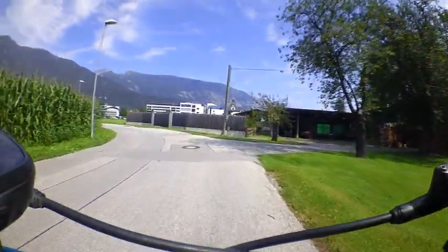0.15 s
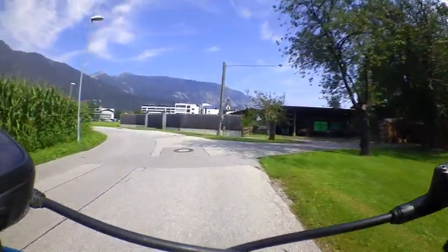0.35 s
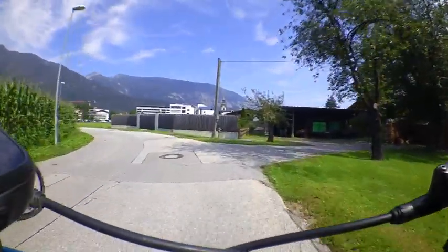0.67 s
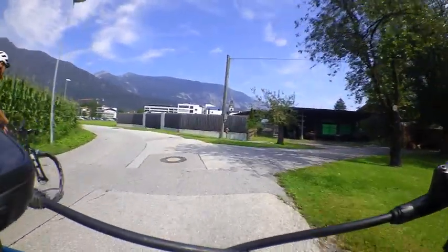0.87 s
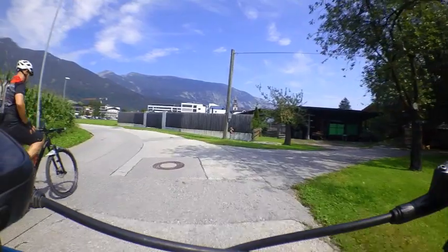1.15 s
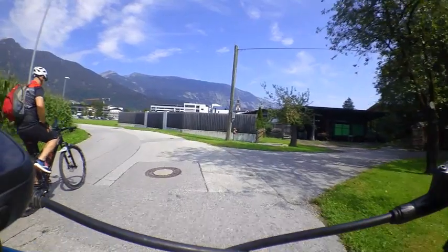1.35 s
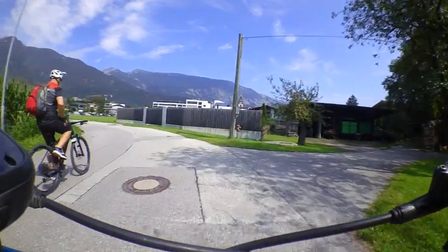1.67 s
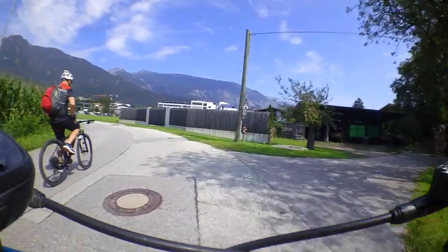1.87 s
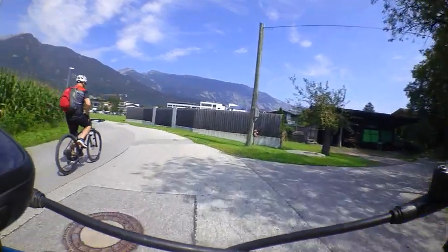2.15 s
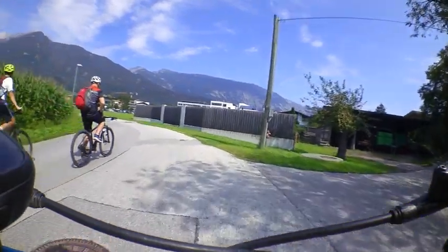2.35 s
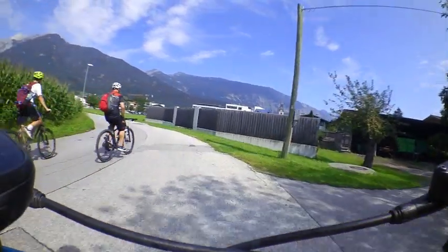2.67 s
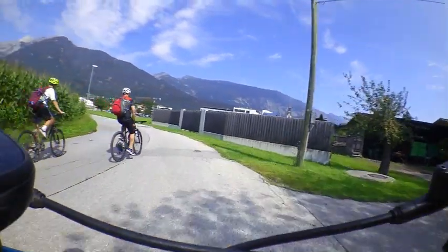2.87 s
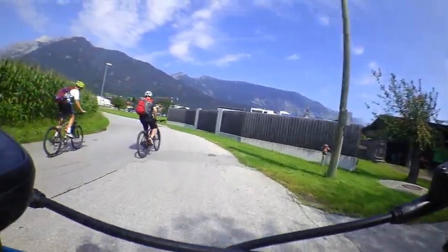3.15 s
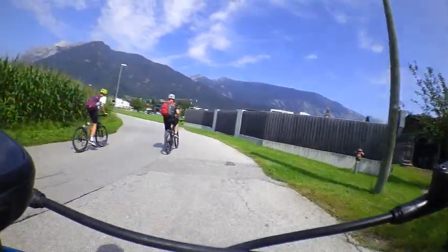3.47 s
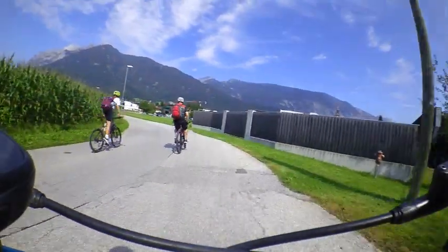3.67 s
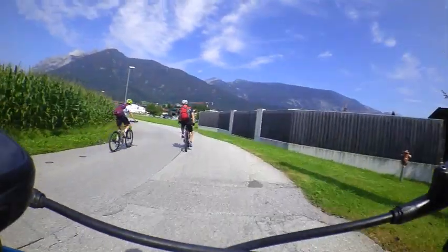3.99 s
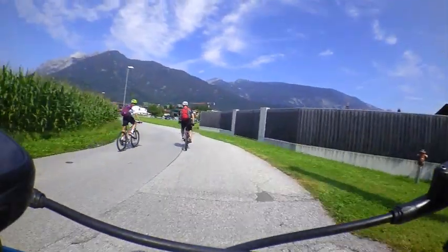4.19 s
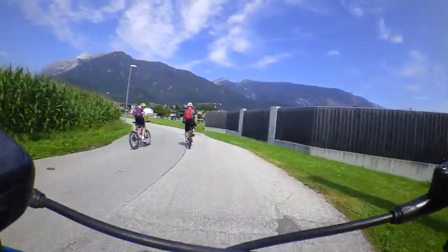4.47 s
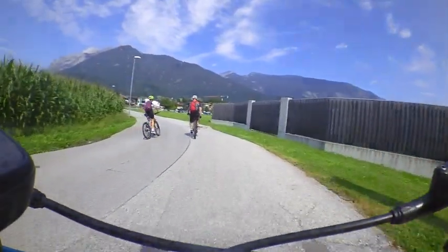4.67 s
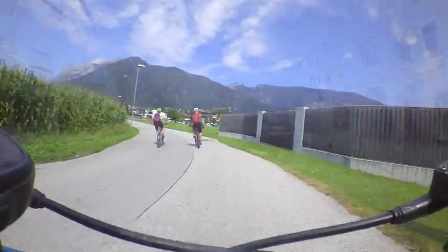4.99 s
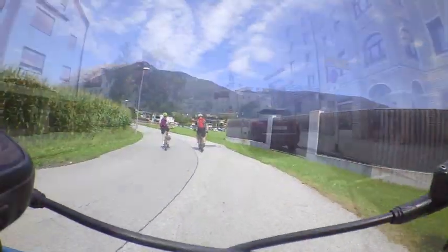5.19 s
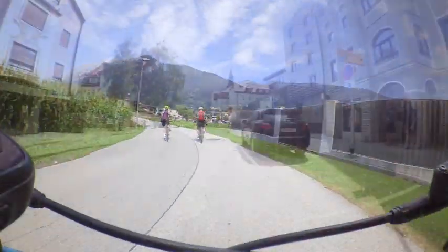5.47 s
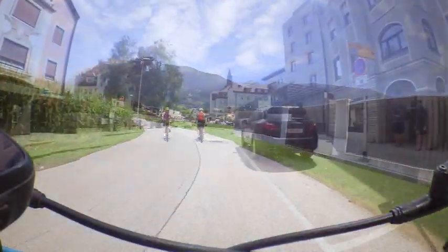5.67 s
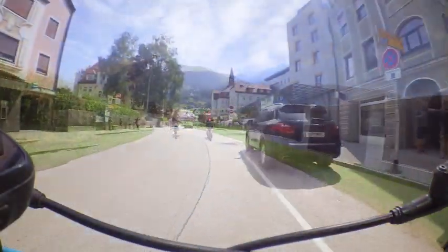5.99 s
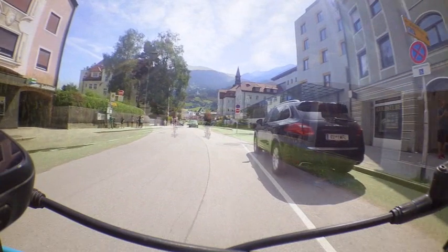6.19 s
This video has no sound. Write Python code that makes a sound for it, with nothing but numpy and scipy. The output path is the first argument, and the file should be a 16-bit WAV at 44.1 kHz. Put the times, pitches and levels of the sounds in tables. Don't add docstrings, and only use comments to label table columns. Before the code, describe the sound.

A bicycle coasts over patched asphalt with a low droning frame rumble, tyre roar, thumps and hard rattling knocks, then smooths out and quietens.

```python
import sys
import numpy as np
from scipy import signal
from scipy.fft import rfft, irfft, next_fast_len
from scipy.io import wavfile
from scipy.ndimage import uniform_filter1d

SR = 44100
rng = np.random.default_rng(int(sys.argv[2]) if len(sys.argv) > 2 else 0)


def undo_db(level):
    steps = np.asarray(level, float) / 20
    return 10 ** steps


def wav_out(sig):
    wavfile.write(sys.argv[1], SR, np.round(np.clip(np.atleast_2d(sig).T, -1, 1) * 32767).astype(np.int16))


N = 279263
SETTLED_S = 5.38

# (frequency [Hz], width [Hz], level [dB])
FRAME_MODES = [(85.4, 57, -14.5), (147.6, 95.7, -8), (196.5, 23.1, 0), (246.7, 29, -13.5)]
# (frequency [Hz], width [Hz], level [dB])
BAR_MODES = [(314.3, 33.8, -2), (380.5, 16.6, 0.5), (434.8, 50.4, 1), (504.2, 61.2, -1.5), (583, 111, -12)]
# (frequency [Hz], width [Hz], level [dB])
CLAMP_MODES = [(752, 59, 7.5), (900, 48, -1.5), (1050, 100, -6), (1366, 290, -31), (1740, 67, -4.5)]
# (frequency [Hz], width [Hz], level [dB])
CASE_MODES = [(5360, 1800, 7), (6340, 620, 10), (7100, 220, 2)]
# (time [s], level re ordinary asphalt [dB])
SURFACE_GRAIN = [(0, 3.5), (.76, 2), (1.9, 1), (2.5, 0.5), (2.56, 1.5), (2.66, -5.5), (3.0, -4.5),
                 (3.5, 0.5), (3.8, -4), (4.05, -2.5), (4.6, -4.5), (4.9, -2.5), (5.16, -6.5), (5.6, -4),
                 (5.95, -4), (6.1, -0.5), (6.33, -2.5)]
# (time [s], half length [s], tread roar [dB], heave [dB])
SURFACE_PATCHES = [(.32, .07, 0, 5), (.5, .05, 0.5, -3.5), (.95, 0.087, 0.5, -6), (1.07, .09, 2, 5),
                   (1.27, 0.044, 1.3, -5.5), (1.65, 0.11, 2, 0.7), (2.3, 0.11, -0.5, -4),
                   (2.5, .05, 0, 4.5), (3.0, 0.08, -0.3, 6), (3.3, 0.05, -3, 2.5), (3.58, 0.065, .3, -3.5),
                   (4.27, 0.045, 0, -5.5), (4.65, .08, -1, -0.5), (5.02, 0.044, 5.5, 3),
                   (5.25, 0.056, 1.5, 5.5), (5.6, .06, .3, -5), (6.04, .05, 0.5, -8)]


def rms_one(x):
    return x / np.sqrt(np.mean(x ** 2) + 1e-20)


def in_time(rows):
    s, *columns = np.transpose(rows)
    return [np.interp(np.arange(N) / SR, s, c) for c in columns]


def at_hz(points, hz):
    table_hz, values = np.array(points)[:, 0], np.array(points)[:, 1]
    return np.interp(np.log(hz), np.log(table_hz), values)


def swells_db(rows):
    s, half, first_db, second_db = np.transpose(rows)
    coarse = np.arange(0, N + 20, 20)
    bell = np.exp(-((coarse[:, None] / SR - s) / half) ** 2)
    return [np.interp(np.arange(N), coarse, bell @ db) for db in (first_db, second_db)]


def drift(rate):
    r = np.exp(-40 * np.pi * rate / SR)
    slow = signal.lfilter([1], [1, -2 * r, r * r], rng.standard_normal(N // 20 + 2002))[2000:]
    return np.interp(np.arange(N) / 20, np.arange(len(slow)), rms_one(slow))


def low_pass(x, hz, order):
    return signal.sosfilt(signal.butter(order, hz, fs=SR, output="sos"), x)


def resonate(x, hz, width_hz):
    r = np.exp(-np.pi * width_hz / SR)
    zeros = np.array([1, 0, -1]) * (1 - r * r) / 2
    poles = [1, -2 * r * np.cos(2 * np.pi * hz / SR), r * r]
    return signal.lfilter(zeros, poles, x + 1e-18)


def body(x, modes):
    return sum((-1) ** k * undo_db(db) * resonate(x, hz, width) for k, (hz, width, db) in enumerate(modes))


def stereo(mid, side, hz):
    # (frequency [Hz], left-right likeness [0..1])
    likeness = [(30, 0.93), (120, 0.98), (300, 1), (500, 1), (1200, 0.93), (4000, 0.76), (12000, 0.57)]
    alike = np.clip(at_hz(likeness, hz), 0, 1)
    opposite = np.array([[1], [-1]])
    return np.sqrt((1 + alike) / 2) * mid + np.sqrt((1 - alike) / 2) * side * opposite


def grit(per_s, spread_db, smooth):
    struck = rng.random(N) < per_s / SR
    sizes = undo_db(spread_db * np.minimum(rng.exponential(1, N), 5)) * struck
    return rms_one(sizes * rng.standard_normal((2, N))) + smooth * rng.standard_normal((2, N))


def banded(source, spectrum, shared_db, own_db, count):
    size = next_fast_len(N)
    hz = np.maximum(np.fft.rfftfreq(size, 1 / SR), 1)
    lowest, highest = spectrum[0][0], spectrum[-1][0]
    skirted = [(lowest * .7, -90)] + spectrum + [(highest * 1.1, -90)]
    coloured = rfft(source, size) * undo_db(at_hz(skirted, hz))
    centres, together = np.geomspace(lowest, highest, count), drift(70.0)
    out = 0
    for k, centre in enumerate(centres):
        share = np.interp(np.log(hz), np.log(centres), np.arange(count) == k)
        mid, side = irfft(coloured * share, size)[:, :N]
        out = out + undo_db(shared_db * together + own_db * drift(4.1)) * stereo(mid, side, centre)
    return rms_one(out)


def shaken(shake, modes, cut_hz, order, hold_s):
    lead_in = np.concatenate([shake[:, -4000:], shake], axis=1)
    rung = low_pass(body(lead_in, modes), cut_hz, order)[:, 4000:]
    hold = round(hold_s * SR)
    level = uniform_filter1d(uniform_filter1d(rung[0] ** 2, hold), hold)
    return rms_one(rung / (level + .02 * level.mean()) ** .36)


def bursts(times, peaks_db, length_s):
    out, age = np.zeros((2, N + 2000)), np.arange(2000) / SR / length_s
    rattle = rng.standard_normal((len(times), 2, 2000)) * age * np.exp(1 - age)
    for s, db, contacts in zip(times, peaks_db, rattle):
        start = round(s * SR)
        out[:, start:start + 2000] += undo_db(db) * contacts
    return out[:, :N]


def recorder_gain_db():
    # (time [s], depth [dB])
    ducks = [
        (2.526, 9),
        (2.89, 0),
        (4.951, 4),
        (5.3, -2),
    ]
    attack_s, recover_db_per_s = 0.014, 14
    age = np.arange(N) / SR - np.array(ducks)[:, :1]
    depth_db = np.array(ducks)[:, 1:] - recover_db_per_s * age
    return -np.max(np.clip(age / attack_s, 0, 1) * np.maximum(depth_db, 0), axis=0)


def freewheel(count_so_far, click_db):
    at = np.flatnonzero(np.diff(np.floor(count_so_far)) > 0)
    times = at / SR + rng.uniform(0, 0.0013, len(at))
    puffs = bursts(times, click_db[at] + rng.normal(2.5, 2.0, len(at)), 0.0031)
    bright = resonate(resonate(puffs, 9600, 3000.0), 10800, 3500.0)
    return stereo(*(bright + .3 * resonate(puffs, 5600, 700.0)), 10000) * undo_db([[.8], [-.8]])


def pawls():
    # (time [s], pawl clicks so far [count])
    wheel = [
        (0, .4),
        (1.128, 30),
        (2.408, 62),
        (3.028, 77),
        (3.537, 89),
        (4.181, 104),
        (5.396, 132),
        (5.42, 132.5),
        (6.34, 132.6),
    ]
    own_db, passer_db = -54.5, -55
    passer_per_s, nearest_s, span_s, gone_s = 45, 1.1, 1, 2.5
    t = np.arange(N) / SR
    passing_db = passer_db - 10 * np.log10(1 + ((t - nearest_s) / span_s) ** 4)
    own = freewheel(in_time(wheel)[0], np.full(N, own_db))
    return own + freewheel(passer_per_s * np.minimum(t, gone_s), passing_db)


def tyres():
    # (frequency [Hz], density [dB per Hz])
    roar_spectrum = [(560, -24), (950, 0), (997, 0), (1440, -1.5), (1580, -3), (2270, -5.5), (3270, -11),
                     (3770, -12.5), (4270, -15), (4670, -29), (4900, -42), (6370, -61.5), (10800, -120)]
    # (frequency [Hz], density [dB per Hz])
    hiss_spectrum = [(4700, -16), (5100, -8.5), (5950, -3), (6700, -8.5), (7500, -13), (10100, -12),
                     (12500, -11.5), (14400, -11), (16400, -9.5)]
    # (time
    # [s], level [dB])
    air_rush = [(0, -65.5), (.9, -64), (1.04, -66.5), (2.49, -66.5), (2.55, -77.5), (2.75, -77), (3.4, -70),
                (4.09, -69), (4.9, -71.5), (5.0, -71), (5.3, -73.5), (5.45, -75), (5.68, -72.5),
                (6.33, -69)]
    roar_db, hiss_db = -43, 6.5
    roar = banded(grit(2500, spread_db=2.0, smooth=1.0), roar_spectrum, 1.63, 1.9, count=8)
    hiss = banded(rng.standard_normal((2, N)), hiss_spectrum, 0.94, 0.77, count=6)
    roar_level = undo_db(roar_db + in_time(SURFACE_GRAIN)[0] + swells_db(SURFACE_PATCHES)[0])
    hiss_level = undo_db(hiss_db + in_time(air_rush)[0] - recorder_gain_db())
    return 1.064 * roar_level * roar + hiss_level * hiss


def ticks(rows):
    # (frequency [Hz], width [Hz], level [dB])
    tick_modes = [(2330, 170, -15), (3040, 110, -6.5), (3746, 130, -2.5), (4285, 170, -1)]
    # (frequency [Hz], width [Hz], level [dB])
    upper_ring = [(6720, 1100, -1)]
    tick_s, upper_s, air_s = 0.001207, 0.00057, 0.0012
    snap_db = 18.5
    s, peak_db, upper_db, air_db = np.transpose(rows)
    contacts = bursts(s, peak_db + 16.5, tick_s)
    touch = np.round((s + tick_s) * SR).astype(int)
    contacts[:, touch] += undo_db(peak_db + 11.5 + snap_db) * np.array([[1], [.6]])
    low = body(contacts, tick_modes) + undo_db(-27.0) * resonate(contacts, 3300, 2500.0)
    low = low_pass(low, 4600, order=8)
    upper = body(body(bursts(s, peak_db + upper_db + 11.5, upper_s), CASE_MODES), upper_ring)
    high_pass = signal.butter(4, 8600, "high", fs=SR, output="sos")
    air = signal.sosfilt(high_pass, bursts(s, peak_db + air_db + 6.0, air_s))
    return stereo(*(low + upper + air), 11000)


def cable_and_chain():
    # (time [s], peak [dB], upper modes [dB], top air [dB])
    slaps = [(0.2548, -39.5, -7, -32), (0.593, -46, -22, -24), (0.617, -29, -14.5, -33.5),
             (0.899, -31.5, -10, -23.5), (1.3905, -47.5, -18, -27), (1.8175, -48, -23, -17.5),
             (2.4976, -27.5, -15.5, -16.5), (2.8416, -38, -20, -29.5), (2.8457, -40, -13.5, -32),
             (2.8674, -35, -5, -25.5), (2.881, -28.5, -10, -30), (2.884, -34, -4.5, -19.5),
             (2.9586, -42, -14, -28), (3.009, -49.5, -13, -30.5), (3.0813, -52.5, -6, -21),
             (3.1105, -33, -17, -35.5), (3.1574, -32.5, -16, -28.5), (3.1865, -35, -11, -27.5),
             (3.2300, -32, -14, -29.5), (3.2332, -36, -11, -28), (3.208, -47, -16, -22.5),
             (3.2585, -50, -18, -25), (3.352, -49, -16, -23.5), (3.387, -47, -19, -20),
             (3.395, -48, -14, -26.5), (3.406, -46, -13, -24), (3.413, -45, -15, -23.5),
             (3.4407, -31.5, -17, -27), (3.4625, -36.5, -14.5, -26.5), (3.5163, -32, -11.5, -24.5),
             (3.538, -42.5, -10, -23), (3.6764, -45, -8, -19.5), (3.785, -42, -21, -28.5),
             (3.94, -47.5, -6, -23), (4.2879, -34, -15, -27.5), (4.9080, -38.5, -20, -21.5),
             (4.929, -31.5, -10, -25), (5.1088, -44, -10, -20), (5.8083, -45, -15, -22),
             (5.875, -49.5, -19, -22), (6.0295, -37, -19, -33.5), (6.095, -44.5, -8, -22)]
    # (time [s], peak [dB], upper modes [dB], top air [dB])
    strikes = [(0.488, -51.5, -8, -15.5), (1.769, -43, -9, -17.5), (2.253, -51.5, -9, -8.5),
               (2.507, -33, -22, -20.5), (2.5148, -27.5, 0, -15), (2.5185, -28.5, -11, -14.5),
               (2.5189, -26.5, -1, -12), (2.52, -34, -4, -12), (2.5218, -36.5, -12, -11.5),
               (4.7899, -40, -6.5, -13.5), (4.9313, -36, -5, -22.5), (4.9402, -37.5, -1, -4),
               (4.9563, -41.5, -13, -19.5), (4.982, -47.5, 1, -22), (5.251, -43.5, -16, -12.5),
               (5.2712, -43, -18, -22.5), (5.2884, -46, -1, -6), (5.2903, -31, -5, -12),
               (5.3, -41, -5, -11.5), (5.315, -38, -19, -23.5), (5.319, -39, -15, -23),
               (5.3254, -40, -6, -9.5), (5.337, -42.5, 0, -12.5), (5.394, -51.5, -5, -11)]
    sheath_db = -3.5
    muffled = [(s, db, upper_db, air_db + sheath_db) for s, db, upper_db, air_db in slaps]
    return ticks(muffled + strikes)


def knocks():
    # (time [s], peak [dB], ring [Hz], sharpness [dB])
    blows = [(0.65, -23, 789, -12.5), (0.895, -17, 740, -6), (0.899, -27, 910, -0.5), (0.91, -28, 800, 1.5),
             (1.287, -19.5, 890, -6), (2.004, -27, 767, -5), (2.046, -23.5, 626, -11.5),
             (2.124, -20.5, 800, -29.5), (2.254, -44, 770, -14), (2.498, -17, 1115, -20.5),
             (2.5075, -9.5, 945, -8), (2.5087, -15, 1216, -3), (2.5148, -19.5, 970, 0.5),
             (2.605, -39.5, 640, -10), (2.651, -47, 640, -25), (2.778, -34, 762, -5.5),
             (2.843, -22.5, 1396, -4.5), (2.845, -22, 1410, -4.5), (2.852, -23, 760, -5),
             (2.888, -19.5, 740, -6), (3.105, -31, 624, -11), (3.352, -37, 900, -11), (3.39, -19, 724, -13),
             (3.41, -28.5, 900, -2), (3.684, -33, 620, -21), (3.966, -34.5, 640, -13.5),
             (4.124, -30, 630, -18.5), (4.348, -33.5, 626, -19), (4.393, -35, 620, -21),
             (4.747, -23, 640, -25), (4.812, -37, 625, -15), (4.867, -30.5, 650, -3.5),
             (4.9082, -14.5, 750, -11), (4.915, -33.5, 764, -8.5), (4.9287, -12, 1223, -13.5),
             (4.9308, -1.5, 752, -21.5), (4.9357, -4, 820, -27), (4.9365, -13.5, 1164, -9.5),
             (4.9385, -12, 596, -24.5), (4.955, -15.5, 766, -14.5), (4.984, -29.5, 770, -1),
             (5.106, -39, 818, 2), (5.176, -43, 620, -7), (5.404, -48, 620, -18), (5.2465, -23, 750, -13),
             (5.251, -31, 1490, -5), (5.285, -23.5, 930, -9.5), (5.322, -27, 930, -9),
             (6.216, -27.5, 744, -55)]
    s, peak_db, ring_hz, sharp_db = np.transpose(blows)
    rung = low_pass(body(bursts(s, peak_db + 10.0, 0.0017), CLAMP_MODES), 960, order=2)
    impulse = np.arange(1500) == 0
    for (when, db, hz, crack_db), side in zip(blows, rng.choice([-1, 1], len(blows))):
        i = round(when * SR)
        ring = resonate(resonate(impulse, hz, 81.0), hz, 460.0)
        crack = resonate(resonate(impulse, 2.3 * hz, 250.0), 2600, 2600.0)
        tap = low_pass(ring * undo_db(db + 38.5) + crack * undo_db(db + crack_db + 22.5), 2200, order=4)
        rung[:, i:i + 1500] += tap[:N - i] * np.array([[1], [1.2 * side]])
    edge = resonate(bursts(s, peak_db + sharp_db + 4.5, 0.0028), 1400, 1000.0)
    edge = low_pass(edge, 3900, order=4)
    loose = bursts(s, peak_db + sharp_db - 1.5, 0.0045) * undo_db(2.2 * drift(300.0))
    rattle = low_pass(resonate(loose, 1100, 2200.0), 4300, order=8) + undo_db(-23.5) * body(loose, CASE_MODES)
    return stereo(*(rung + edge + rattle), 9000)


def landings():
    # (time [s], peak [dB], direction [+1 or -1], pitch [Hz])
    rim_blows = [(2.0061, -11.5, 1, 326), (2.4437, -6, 1, 327), (2.5092, -6.5, -1, 520),
                 (2.5108, -1.5, -1, 400), (2.5143, -11, 1, 341), (2.5172, -9.5, 1, 145.4),
                 (2.8439, -8, 1, 200), (4.9420, -4, 1, 278), (4.9446, -16, -1, 199), (4.961, -8.5, 1, 198),
                 (5.1075, -23, -1, 397), (5.2452, -11, -1, 266), (5.2497, -5.5, 1, 400),
                 (5.2512, -6, -1, 151), (5.288, -5.5, 1, 193), (5.2903, -5, -1, 388)]
    push_cycles, damping = 0.39, .7
    out = np.zeros(N)
    for s, peak_db, direction, hz in rim_blows:
        push, start = np.zeros(1500), round(s * SR)
        length = round(push_cycles / hz * SR)
        push[:length] = np.sign(direction) * undo_db(peak_db) * np.hanning(length)
        thud = undo_db(8.5) * resonate(push, hz, damping * hz)
        out[start:start + 1500] += thud + undo_db(-5.0) * resonate(push, 1500, 2000.0)
    return out


def thumps():
    # (time [s], peak [dB], bar share [dB])
    seams = [(0.144, -10, 0.5), (0.278, -0.5, -6.5), (0.578, -3, -7.5), (0.864, -7, -1),
             (0.895, -16.5, 10.5), (1.074, -4, -11), (1.114, -0.5, -7.5), (1.283, -24, -11),
             (1.696, -6.5, -3.5), (2.004, -5, 2.5), (2.043, -19.5, 1.5), (2.112, -12, 9),
             (2.227, -24.5, -16), (2.337, -1, -11.5), (2.437, -3, -1), (2.502, -24, 4), (2.51, -18, 4),
             (2.603, -24, 7.5), (2.649, -31, 3), (2.776, -21, -1), (2.842, -6.5, -15), (2.888, -7, -13.5),
             (3.103, -23, -3.5), (3.116, -3, -16), (3.392, -16, 5), (3.442, -21, 11.5), (3.579, -14, 2.5),
             (3.685, -14, 3), (3.785, 1, -8), (3.967, -11.5, -0.5), (4.037, -9, 5.5), (4.12, -25, -4.5),
             (4.268, 0, -13), (4.346, -21, 1), (4.39, -13, 3), (4.744, -6, 2.5), (4.812, -25, -9),
             (4.866, -12, 5), (4.937, -21, -2), (5.106, -8, -0.5), (5.173, -34, -8), (5.242, -0.5, -1),
             (5.276, -16, 5.5), (5.322, -23, 4), (5.33, -12.5, -1.5), (5.402, -22, 0), (5.789, -27.5, 9),
             (6.02, -19, -6), (6.2, -3, -22.5)]
    jolt_db = -29.5
    kerb_s, kerb_jolt_db = 2.507, 0.5
    s, peak_db, bar_db = np.transpose(seams)
    at, push = np.round((s + 0.003474) * SR).astype(int), np.hanning(round(0.0026 * SR))
    sign = rng.choice([-1, 1], len(at))
    frame, bar, jolt = np.zeros(N), np.zeros(N), np.zeros(N)
    frame[at] = sign * undo_db(peak_db + 9.0)
    bar[at] = sign * undo_db(peak_db + bar_db + 0.5)
    jolt[at] = sign * undo_db(peak_db + jolt_db + 9.5) * (s < SETTLED_S)
    jolt[round(kerb_s * SR)] += undo_db(kerb_jolt_db + 3.0)
    frame, bar, jolt = (np.convolve(v, push)[:N] for v in (frame, bar, jolt))
    direct = undo_db(7.0) * resonate(bar, 460, 180.0)
    direct = direct + undo_db(-2.5) * (resonate(bar, 1600, 1200.0) + resonate(bar, 568, 220.0))
    ringing = body(frame, FRAME_MODES) + undo_db(1.5) * body(bar, BAR_MODES)
    return (direct + ringing + resonate(jolt, 82, 93.0)) * np.ones((2, 1))


def heave():
    # (frequency [Hz], density [dB per Hz])
    sway = [(12, -57), (20, -37), (45, -15.5), (75, 1.5), (120, -5), (160, -38.5), (260, -120)]
    # (time [s], level [dB])
    pitching = [(0.0, -38), (0.26, -23), (0.46, -34), (0.6, -46.5), (1.66, -27), (2.38, -39), (2.55, -46.5),
                (2.8, -50), (3.01, -31.5), (3.15, -41.5), (3.79, -43.5), (3.93, -37.5), (4.41, -32.5),
                (4.72, -28.5), (5.18, -40.5), (5.29, -52.5), (6.12, -61.5), (6.33, -53)]
    heave_db = -1.5
    swaying = banded(rng.standard_normal((2, N)), sway, 1.9, 1.3, count=3)
    return undo_db(heave_db + in_time(pitching)[0] + swells_db(SURFACE_PATCHES)[1]) * swaying


def clamp_buzz(shake):
    # (frequency [Hz], width [Hz], level [dB])
    loose_modes = [(730, 73, 10.5), (857, 59, -4.5), (1310, 270, -5)]
    # (frequency [Hz], width [Hz], level [dB])
    settled_modes = [(848, 100, 3), (1312, 120, -3.5)]
    loose_db, loose_loss_db, settled_db = -39, -4, -41
    settle_s, follows_grain = 0.087, 0.58
    settled = np.clip((np.arange(N) / SR - SETTLED_S) / settle_s + .5, 0, 1)
    loose = shaken(body(shake, CLAMP_MODES), loose_modes, 1800, order=2, hold_s=0.37)
    higher = shaken(body(shake, settled_modes), settled_modes, 2900, order=2, hold_s=0.15)
    buzz = undo_db(loose_db + loose_loss_db * settled) * stereo(*loose, 800)
    buzz = buzz + undo_db(settled_db) * settled * stereo(*higher, 900)
    return undo_db(follows_grain * in_time(SURFACE_GRAIN)[0]) * buzz


def drone(shake):
    # (time [s], level re ordinary asphalt [dB])
    road = [(0, 3), (.5, 0.5), (1.0, 1.5), (1.4, 2.5), (1.9, 2.5), (2.5, 3), (2.62, -3), (2.8, -1.5),
            (3.05, -2), (3.3, -3), (3.66, -10), (3.9, 6), (4.15, 1), (4.9, 2), (5.2, -4.5), (5.4, -14),
            (5.95, -11), (6.33, -8)]
    # (time [s], half length [s], frame swell [dB], bar swell [dB])
    ridges = [(0.134, 0.014, 2.5, 0), (0.606, 0.16, 3, 5.5), (0.79, 0.059, 1, 4), (0.964, 0.072, 10, 2),
              (1.286, 0.027, 4, 1), (1.528, 0.015, 4, 5), (2.05, 0.014, 5, 6.5), (2.335, 0.014, 12.5, 7.5),
              (2.866, 0.04, 12, 11.5), (3.196, 0.036, 3.5, 5), (3.566, 0.13, 8.5, 9), (4.952, 0.02, 5, 4.5),
              (5.24, 0.018, 8.5, 7), (5.252, 0.011, -5.5, 3.5), (5.291, 0.012, 13, 9),
              (5.324, 0.017, 13, -10.5), (5.507, 0.088, 7.5, 6.5), (5.775, 0.069, 6, 6.5),
              (6.033, 0.0061, 6.5, 9.5), (6.19, 0.084, 5, 5.5)]
    # (frequency [Hz], width [Hz], level [dB])
    rocking_modes = [(128, 34, 1.5), (622, 77, -8), (1080, 130, -20.5)]
    frame_db, bar_db, bar_follows_road = -20.5, -23.5, 0.85
    road_db, = in_time(road)
    frame_swell_db, bar_swell_db = swells_db(ridges)
    frame = stereo(*shaken(shake, FRAME_MODES, 440, order=2, hold_s=0.034), 190)
    bar = stereo(*shaken(shake, BAR_MODES, 829, order=4, hold_s=0.065), 450)
    rocking = shaken(shake[::-1], rocking_modes, 1400, order=2, hold_s=.06)[0] * np.array([[1], [-1]])
    frame_level = undo_db(frame_db + road_db + frame_swell_db)
    bar_level = undo_db(bar_db + bar_follows_road * road_db + bar_swell_db)
    return frame_level * frame + bar_level * (bar + undo_db(-15.0) * rocking)


def rolling():
    shake = grit(700, spread_db=2.5, smooth=1.0) * undo_db(0.18 * drift(30.0))
    return 1.056 * (drone(shake) + clamp_buzz(shake)) + heave()


def scene():
    notch_hz, notch_width_hz, notch_depth = 5050, 390, 0.48
    steady = undo_db(recorder_gain_db()) * (pawls() + tyres() + rolling())
    blows = cable_and_chain() + knocks() + landings() + thumps()
    return steady + blows - notch_depth * resonate(blows, notch_hz, notch_width_hz)


def roll_off(x):
    return signal.sosfilt(signal.butter(12, 15750, fs=SR, output="sos"), x)


def record(dry):
    # (frequency [Hz], lead of the left port [rad])
    port_lead = [(0, 0), (690, 0.059), (1720, -0.11), (2760, -0.67), (3190, 0.61), (4050, 0.9),
                 (4480, -0.2), (5680, 0.028), (6290, -1.1), (8180, -0.0), (15300, -0.0)]
    size = next_fast_len(N)
    lead = at_hz(port_lead, np.maximum(np.fft.rfftfreq(size, 1 / SR), 1))
    turn = np.exp(1j * lead / 2 * np.array([[1], [-1]]))
    ports = irfft(rfft(dry, size) * turn, size)[:, :N]
    rounded = 1.151 * np.tanh(ports / 1.455)
    top_cut = signal.cheby2(20, 50, 15800 * 1.025, fs=SR, output="sos")
    return roll_off(signal.sosfilt(top_cut, rounded))


dry = scene()
out = record(dry)
wav_out(out)
```